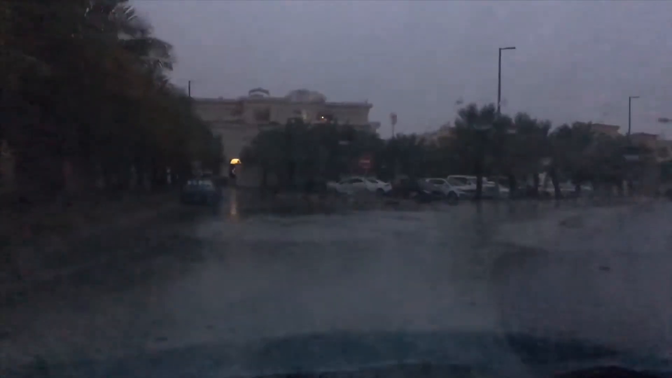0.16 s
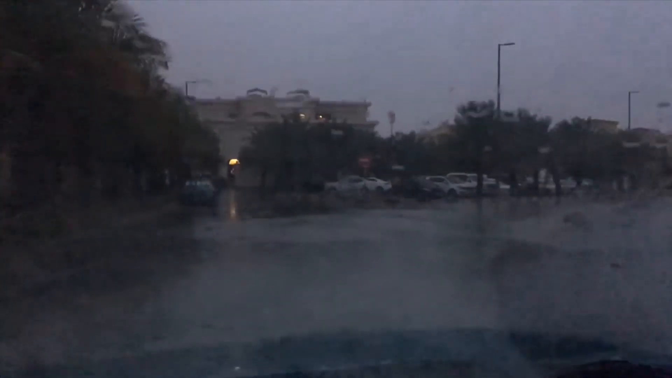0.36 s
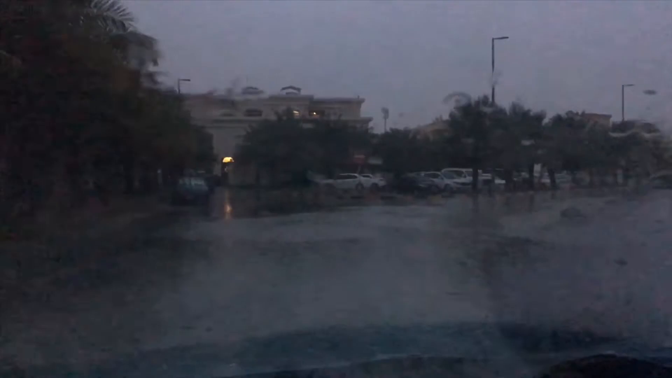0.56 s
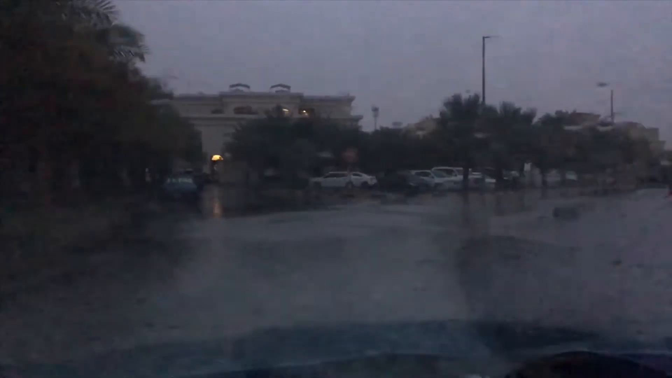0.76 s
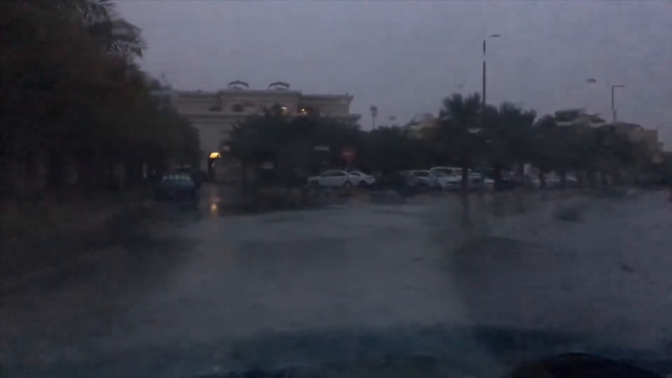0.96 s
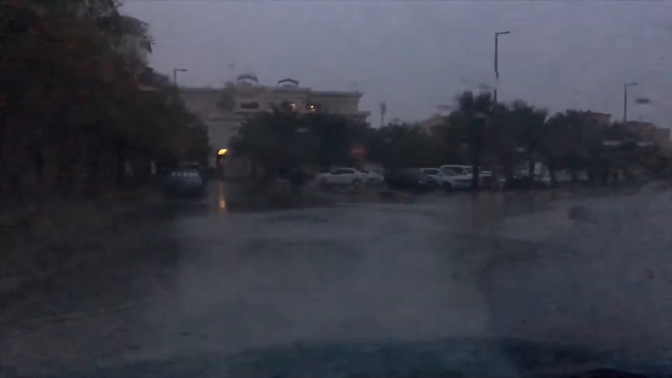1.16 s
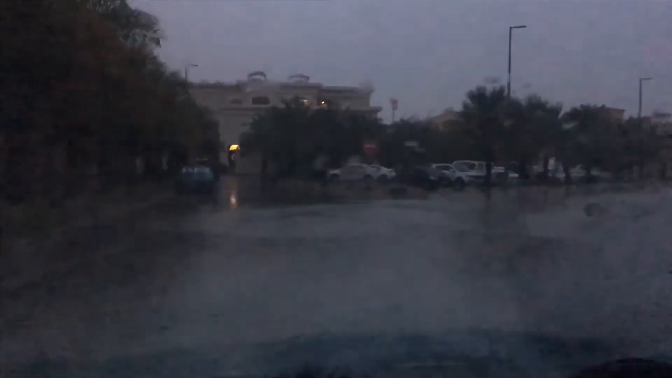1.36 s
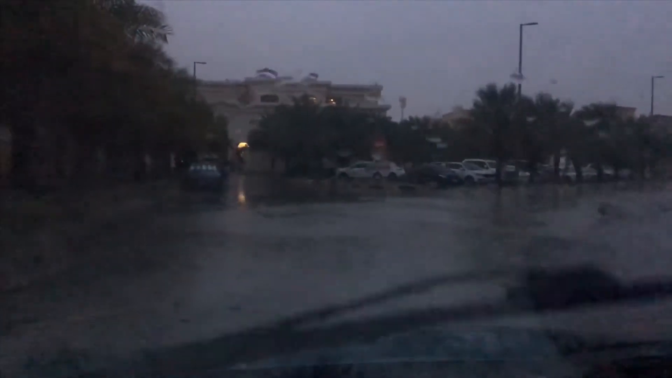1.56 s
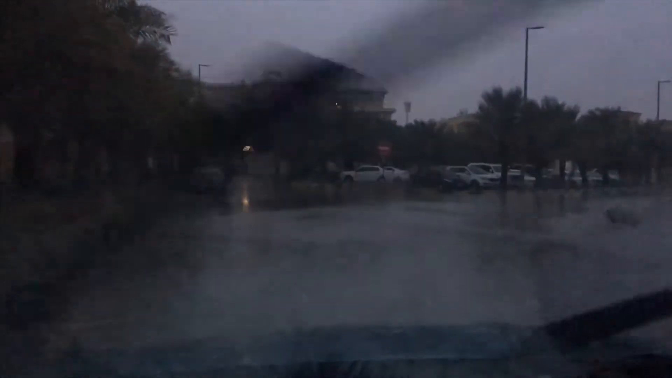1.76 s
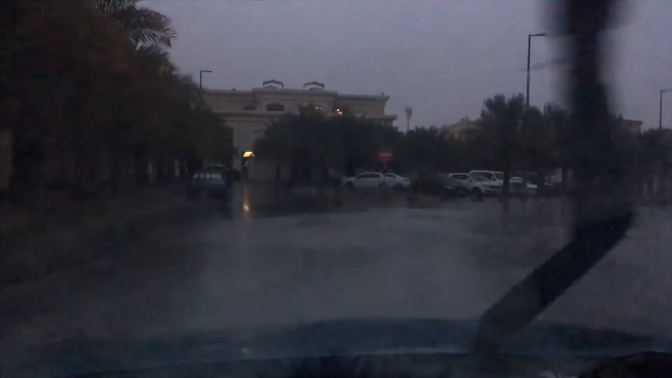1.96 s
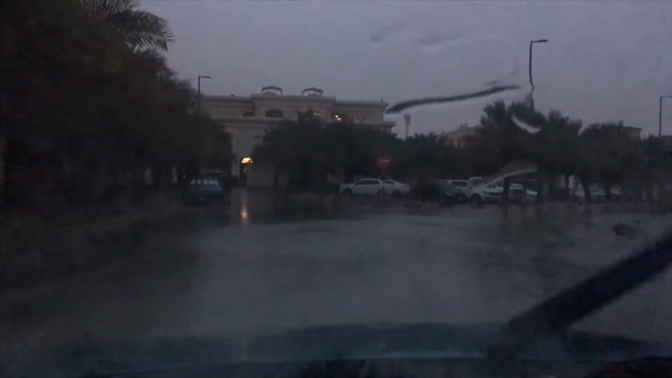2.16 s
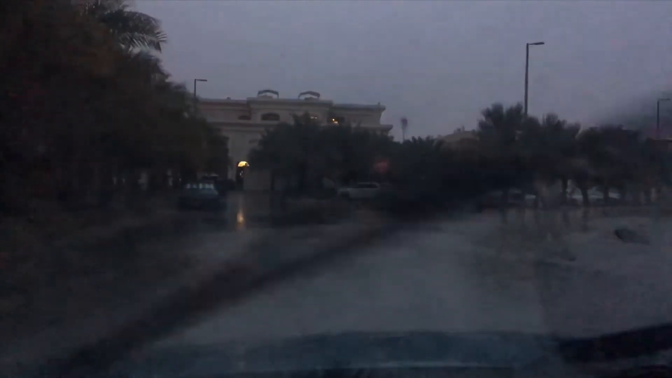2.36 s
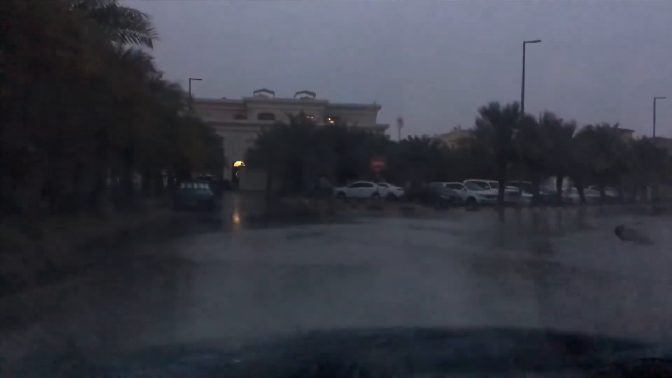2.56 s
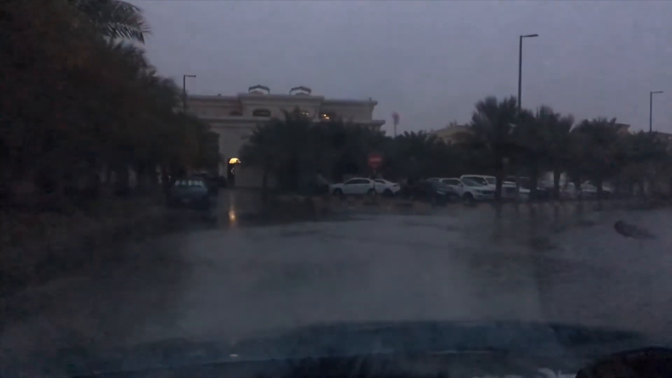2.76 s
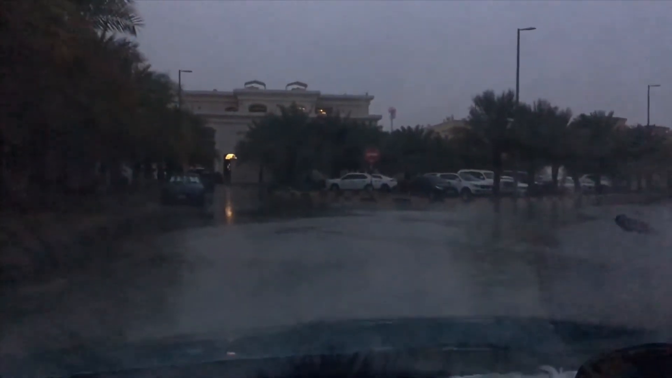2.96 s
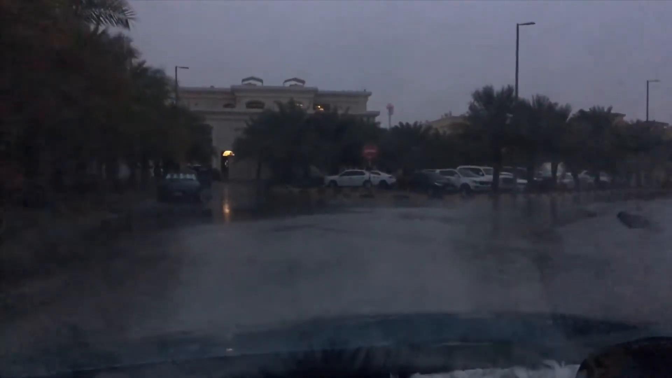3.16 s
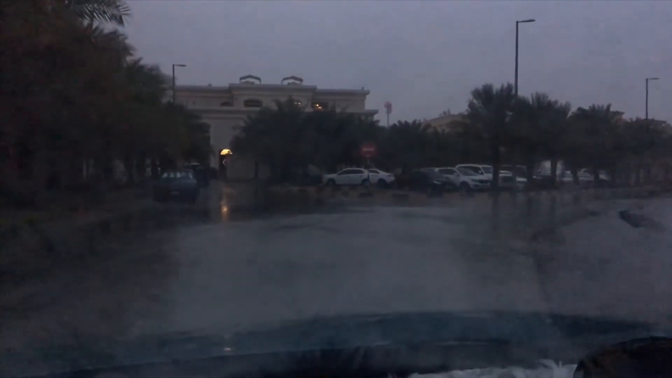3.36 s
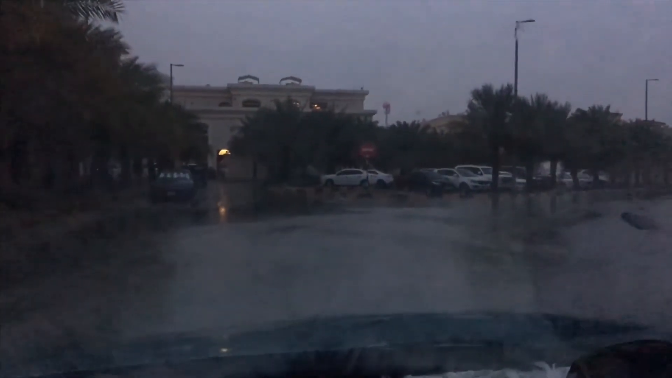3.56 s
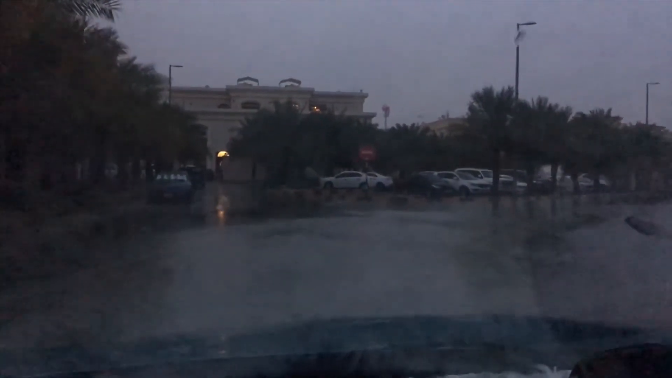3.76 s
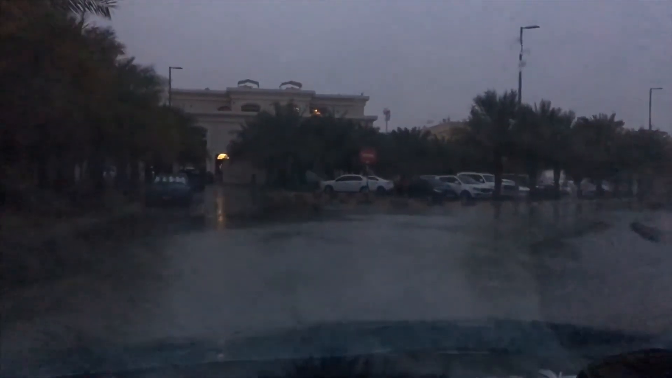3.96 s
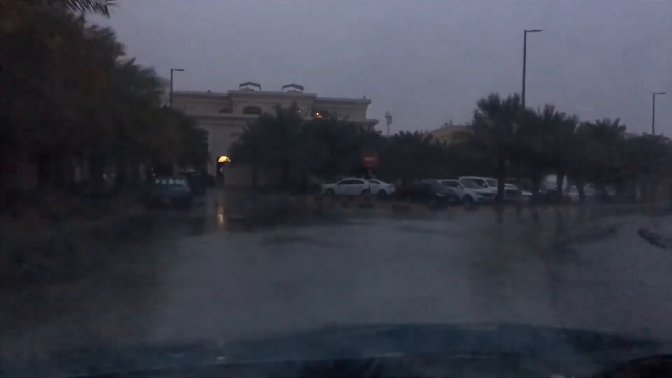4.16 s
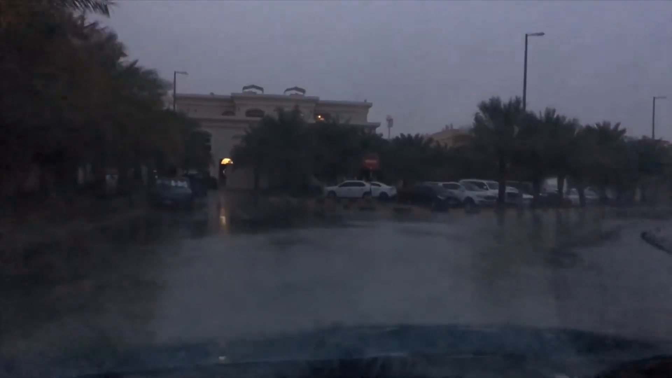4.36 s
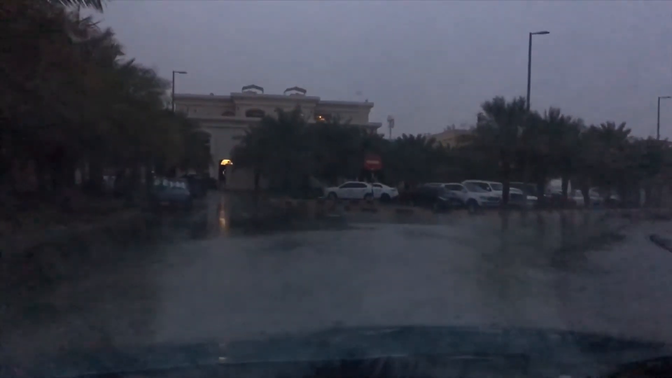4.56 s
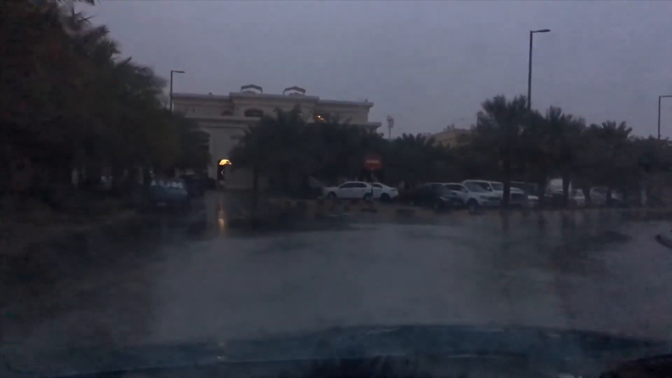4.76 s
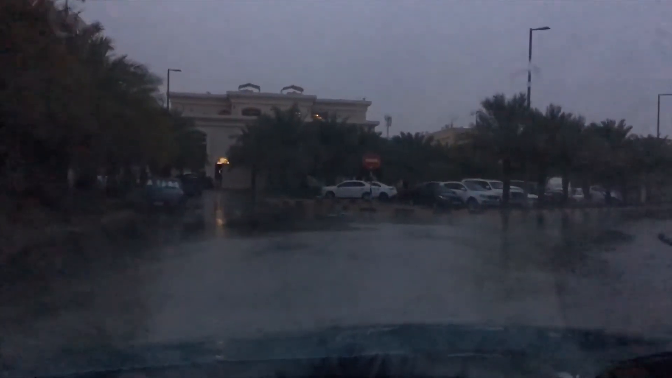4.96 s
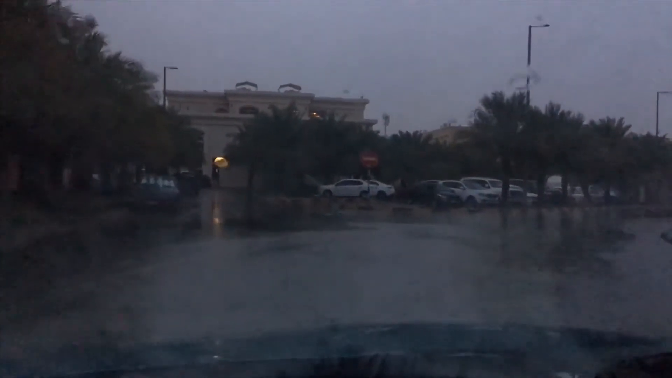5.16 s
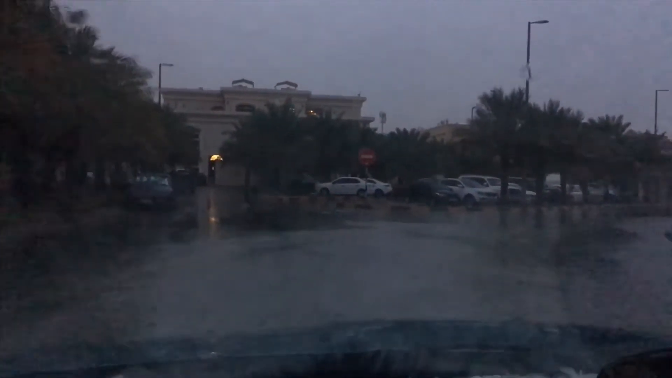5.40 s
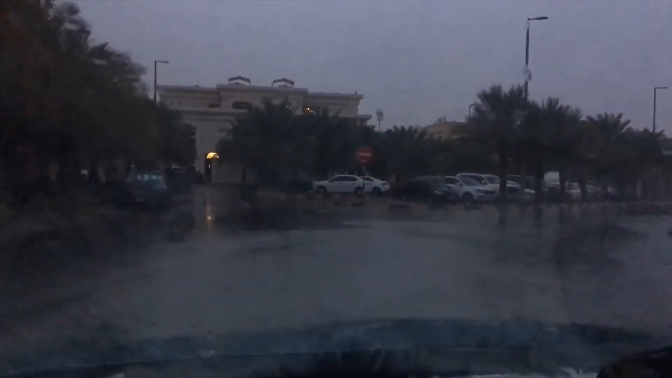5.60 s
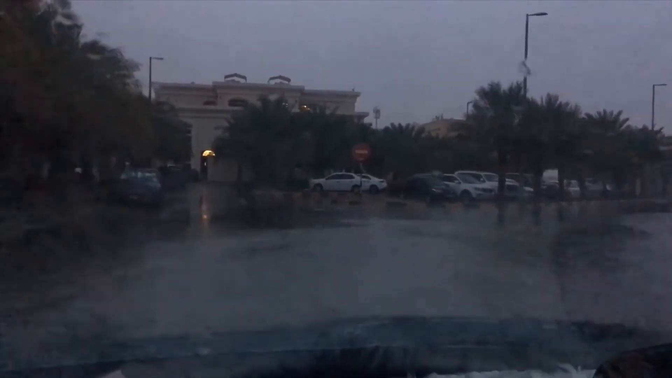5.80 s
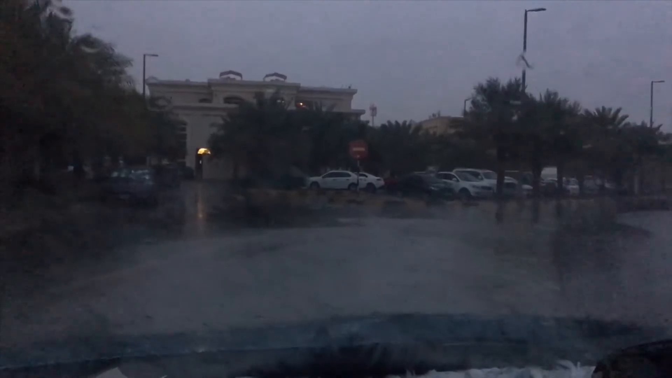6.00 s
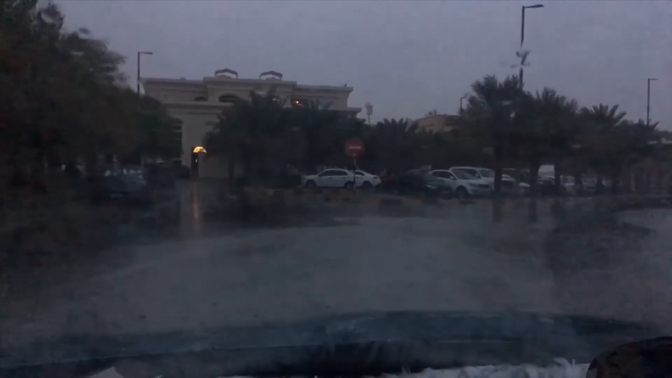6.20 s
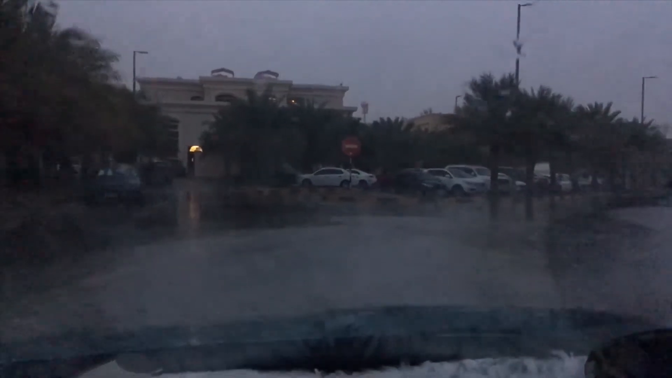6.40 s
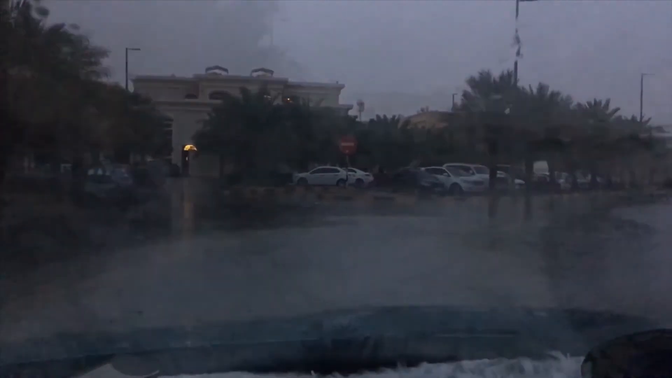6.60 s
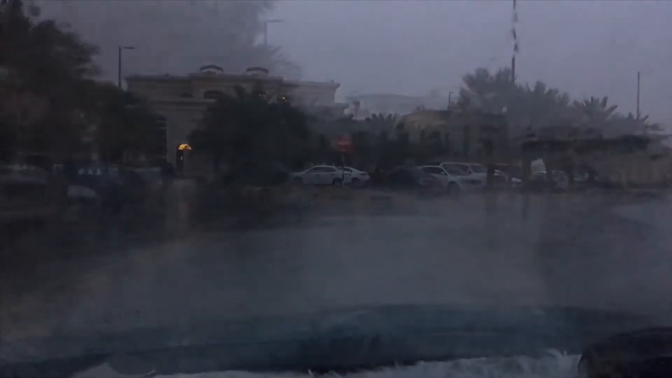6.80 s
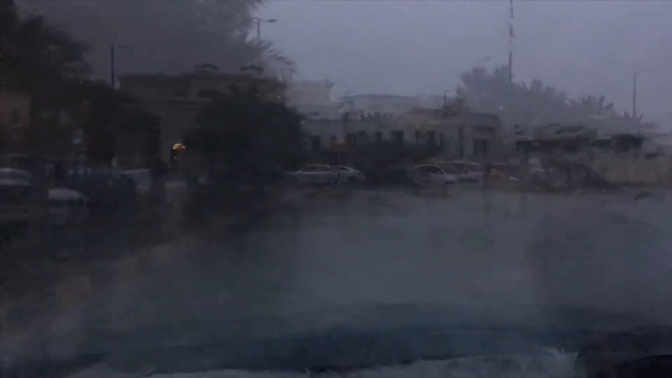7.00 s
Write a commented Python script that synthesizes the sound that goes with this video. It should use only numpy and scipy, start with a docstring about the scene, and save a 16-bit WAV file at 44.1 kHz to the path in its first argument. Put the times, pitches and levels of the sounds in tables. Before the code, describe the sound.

The sound is heard from behind the windshield of a slowly rolling car. A low tyre boom fills the cabin for all seven seconds, with a faint wash of water beneath it. Rain patters on the glass and roof, with distinct larger drops and a few sharp trim ticks in the first second. At about 1.2 seconds a switch clicks. From 1.3 to 2 seconds the wiper drags up the glass, the loudest event, its rubber thudding, juddering and giving short, low, falling groans. A sharp click marks the turn at 2 seconds. The blade slides back softly with a brief motor hum and stops with a click near 2.7 seconds. The rain then continues more lightly, with scattered taps, faint ticks and a few dull drips on the roof between 4 and 5.3 seconds. The rumble swells slightly around 4.3 and 6 seconds.

```python
"""Inside a car rolling slowly along a wet road in heavy rain.
The tyres make the cabin boom and wash through water. Drops patter on the glass and roof,
and hard bits of trim tick now and then. The wiper makes one sweep: a relay clicks, the rubber
blade sticks and slips up the glass, juddering and groaning, then slides back softly as its motor hums."""
import sys
import numpy as np
from scipy import signal
from scipy.fft import rfft, irfft
from scipy.io import wavfile
from scipy.ndimage import uniform_filter1d

SR = 44100
rng = np.random.default_rng(int(sys.argv[2]) if len(sys.argv) > 2 else 0)


def unload_audio(sound):
    """Save the sound as a 16-bit wav file, at the path given as the first command line argument."""
    columns = np.transpose(np.atleast_2d(sound))
    # keep every value between -1 and 1, then stretch to whole-number steps
    steps = np.round(np.clip(columns, -1, 1) * 32767)
    wavfile.write(sys.argv[1], SR, steps.astype(np.int16))


N = 310464
TIME = np.arange(N) / SR

# The bright tone of fine spray and tiny cracks. Each row: frequency in Hz, level in dB.
SPRAY = [(2000, -37.5), (4500, 2), (7000, 3), (9500, 2.5), (12000, 3), (15500, -4)]


def undb(db):
    """Turn decibels into a number to multiply by."""
    return 10 ** (np.asarray(db) / 20)


def curve(rows):
    """Join (seconds, value) points with straight lines."""
    return np.interp(TIME, *np.transpose(rows))


def unit(x):
    """Scale a sound to an average (rms) size of 1."""
    return x / np.sqrt(np.mean(x ** 2))


def peak(x, db):
    """Scale a sound so that its highest peak is at this level."""
    return x * undb(db) / np.max(np.abs(x))


def add(out, s, x):
    """Mix a sound in, starting at s seconds."""
    i = int(s * SR)
    out[i:i + len(x)] += x[:N - i]


def colour(x, points, tilt_db=0, size=8192):
    """Shape the tone through (Hz, dB) points, fading beyond both ends; tilt_db is added per octave."""
    hz, db = np.transpose(points)
    octave = np.log2(np.maximum(np.fft.rfftfreq(size, 1 / SR), 1))
    outside = np.abs(octave - np.clip(octave, np.log2(hz[0]), np.log2(hz[-1])))
    gain_db = np.interp(octave, np.log2(hz), db) + tilt_db * octave - 20 * outside
    # Build the filter so that it rings only after a hit, never before it.
    cepstrum = irfft(np.log(undb(gain_db)))
    cepstrum[1:size // 2] *= 2
    cepstrum[size // 2 + 1:] = 0
    response = irfft(np.exp(rfft(cepstrum)))
    return signal.oaconvolve(x, response)[:len(x)]


def uneven(points, scatter_db):
    """Nudge a tone's levels at random, since every spot sounds a little different when hit."""
    hz, db = np.transpose(points)
    return np.column_stack([hz, db + scatter_db * rng.standard_normal(len(db))])


def walk(rate):
    """A smooth random wobble that heads for a new value `rate` times a second."""
    hold = max(int(SR / rate), 1)
    steps = np.repeat(rng.standard_normal(N // hold + 1), hold)
    return unit(uniform_filter1d(uniform_filter1d(steps, hold), hold)[:N])


def fade(t60, size=6000):
    """Die away by 60 dB every t60 seconds."""
    return np.exp(-np.log(1000) * TIME[:size] / t60)


def swell(start, end, attack_s, release_s):
    """A loudness shape: rise in a straight line, hold until the end, then die away."""
    rise = np.clip((TIME - start) / attack_s, 0, 1)
    return rise * np.exp(-np.maximum(TIME - end, 0) / release_s)


def sagging(hz, start, octaves_per_s):
    """The phase of a tone whose pitch sinks steadily from the start time on."""
    pitch = hz * 2 ** (-octaves_per_s * np.maximum(TIME - start, 0))
    return 2 * np.pi * np.cumsum(pitch) / SR


def burst(crack_t60, tail_db, tail_t60, size=6000):
    """A short crack of noise followed by a fainter, longer tail."""
    return rng.standard_normal(size) * (fade(crack_t60) + undb(tail_db) * fade(tail_t60))


def ring(modes, scatter_db, detune, size=6000):
    """A struck part rings at its own notes (modes), which vary with where the blow lands."""
    out = np.zeros(size)
    for hz, db, t60 in modes:
        louder, higher, side = rng.standard_normal(3)
        tone = np.sin(2 * np.pi * hz * (1 + detune * higher) * TIME[:size])
        out += np.sign(side) * undb(db + scatter_db * louder) * fade(t60, size) * tone
    return out


def favour(modes, centre_hz, db_per_octave):
    """A blow brings out the notes nearest to its own pitch."""
    return [(hz, db - db_per_octave * abs(np.log2(hz / centre_hz)), t60) for hz, db, t60 in modes]


def impacts(rate, spread_db, cap_db):
    """Random hits, about `rate` a second, many small and few large."""
    size_db = np.minimum(spread_db * rng.exponential(size=N), cap_db)
    return (rng.random(N) < rate / SR) * undb(size_db) * rng.choice([-1, 1], N)


def shower(rate, spread_db, cap_db, crack_t60, tail_db, tail_t60):
    """Random hits, each a short crack of noise with a faint tail."""
    shape = fade(crack_t60) + undb(tail_db) * fade(tail_t60)
    energy = signal.oaconvolve(impacts(rate, spread_db, cap_db) ** 2, shape ** 2)[:N]
    return rng.standard_normal(N) * np.sqrt(np.abs(energy))


def road():
    """The tyres shake the cabin's air and push through standing water."""
    # The tone of the cabin's boom and of the water. Each row: frequency in Hz, level in dB.
    boom_tone = [(15, -13.5), (24, -6), (33, -5.5), (44, -4.5), (54, 3), (72, -8.5), (105, -14.5),
                 (145, -13.5), (185, -23.5), (240, -40.5), (400, -52)]
    wash_tone = [(100, -5), (180, 0), (270, -1.5), (370, -3), (500, -11.5), (700, -17.5), (1200, -21),
                 (3000, -33), (8000, -49.5)]
    # How loud each is as the car rolls on. Each row: time in seconds, level in dB.
    boom_levels = [(0, -29), (.8, -28), (1.2, -32.5), (3.6, -29.5), (4.3, -26), (4.8, -28.5), (6.1, -24.5),
                   (7.04, -28)]
    wash_levels = [(0, -50), (1, -50), (2.3, -50), (3.5, -50), (4.3, -49.5), (5.4, -48), (6.2, -49),
                   (7.04, -52)]
    boom = colour(rng.standard_normal(N), boom_tone)
    boom /= np.sqrt(uniform_filter1d(boom ** 2, size=9000))  # even rolling keeps the boom steady
    wash = unit(colour(rng.standard_normal(N), wash_tone))
    puddles_db = walk(14)
    return boom * undb(curve(boom_levels)) + wash * undb(curve(wash_levels) + puddles_db)


def rain():
    """Small drops patter on glass and roof; their spray follows the rain and also comes in flurries."""
    # The patter on the car. Each row: time in seconds, level in dB.
    rain_levels = [(0, -53), (.8, -58.5), (1.5, -55.5), (2.9, -60.5), (6.2, -61.5), (7.04, -62)]
    # The tone of drops heard through glass. Each row: frequency in Hz, level in dB.
    glass_tone = [(200, 2.5), (600, 8.5), (1200, -2), (1900, 0.5), (2500, -3.5), (3300, 1), (4300, -4),
                  (5000, -11), (6400, -10.5), (8000, -18), (9500, -18.5), (12000, -42), (16000, -32)]
    # Flurries of fine spray. Each row: start and end in seconds, level in dB.
    flurries = [(0.493, 0.54, -53), (.56, .79, -67), (1.93, 2.456, -69.5), (2.55, 2.767, -66),
                (3.007, 3.293, -70)]
    rain_db = curve(rain_levels)
    taps = shower(rate=480, spread_db=6, cap_db=18, crack_t60=.0028, tail_db=-15, tail_t60=.05)
    specks = shower(rate=200, spread_db=5.5, cap_db=17, crack_t60=.003, tail_db=-15, tail_t60=.06)
    gusts_db = .6 * walk(7.4)
    patter = unit(colour(taps, glass_tone)) * undb(rain_db + gusts_db)
    fizz_gain = undb(-79 + rain_db - rain_db.mean())
    flurry_gain = sum(undb(db) * swell(start, end, attack_s=.012, release_s=.029)
                      for start, end, db in flurries)
    spray = unit(colour(specks, SPRAY)) * np.hypot(fizz_gain, flurry_gain)
    distant_sizzle = unit(colour(rng.standard_normal(N), SPRAY)) * undb(-82)
    return patter + spray + distant_sizzle


def drop(db, splash_db):
    """One drop taps the windshield and splashes; small ones just tick, large ones splatter on."""
    # The tone of the tap. Each row: frequency in Hz, level in dB.
    tap_tone = [(600, -0.5), (1500, -7.5), (2500, -3), (3400, -1.5), (4300, -4), (5100, -11.5), (6500, -14),
                (8500, -26.5)]
    full_splatter_db = -37  # drops at least this loud get the strongest tail
    tail_db = min(db - full_splatter_db, 0) - 11.5
    contact = burst(crack_t60=.002, tail_db=tail_db, tail_t60=.045)
    spatter = burst(crack_t60=.002, tail_db=tail_db - 4, tail_t60=.04)
    tap = colour(contact, uneven(tap_tone, scatter_db=1.5))
    splash = colour(spatter, uneven(SPRAY, scatter_db=6.5))
    return peak(tap, db) + peak(splash, splash_db)


def stray_drops():
    """Middle-sized drops stand out of the patter at random moments."""
    out = np.zeros(N)
    drops_per_s, scatter_db = 9, 1.8
    for s in rng.uniform(0, N / SR, int(drops_per_s * N / SR)):
        tap_db, splash_db = rng.normal([-46.5, -57], scatter_db)
        add(out, s, drop(tap_db, splash_db))
    return out


def heavy_drops():
    """Large drops hit the windshield; fat drips knock dully on the lined roof."""
    # Drops on the windshield. Each row: time in seconds, peak of the tap and of the splash in dB.
    drops = [(0.0817, -42, -37), (0.214, -36, -39), (0.2594, -40, -54), (0.4015, -31, -48),
             (0.414, -34, -39), (0.4576, -36.5, -35.5), (0.5186, -38.5, -36), (0.681, -33, -43),
             (1.068, -36.5, -72), (1.1588, -38, -43), (2.0907, -40.5, -41), (2.1472, -36, -40),
             (2.3635, -34.5, -54), (2.6803, -39, -40.5), (2.944, -38, -55), (3.0972, -33, -46),
             (3.2095, -35.5, -40.5), (3.312, -36, -55), (3.98, -42, -43), (4.0403, -40.5, -49),
             (4.113, -42, -46), (4.533, -45, -46), (5.095, -37.5, -52), (5.1693, -39, -54),
             (5.485, -40.5, -45.5), (5.5872, -37.5, -53), (5.888, -42, -48.5), (5.931, -37, -60),
             (6.044, -40, -60), (6.201, -40, -49), (6.364, -42.5, -56)]
    # Drips on the roof. Each row: time in seconds, peak in dB.
    drips = [(4.05, -36), (4.812, -43), (5.295, -44)]
    # The roof's dull tone. Each row: frequency in Hz, level in dB.
    roof_tone = [(450, -7), (950, 5), (1700, -11), (4000, -14)]
    out = np.zeros(N)
    for s, db, splash_db in drops:
        add(out, s, drop(db, splash_db))
    for s, db in drips:
        knock = burst(crack_t60=.02, tail_db=-7, tail_t60=.08)
        add(out, s, peak(colour(knock, roof_tone), db))
    return out


def trim_ticks():
    """Small hard parts tick and ring briefly, each at its own pitch, brighter for a harder contact."""
    # The ticks. Each row: time in seconds, peak in dB, treble tilt in dB per octave, pitch in Hz.
    ticks = [(0.187, -23, 4, 11300), (0.2809, -35, 7, 11400), (0.3847, -39.5, -1, 15000),
             (0.5075, -32.5, 0, 5000), (0.525, -36, -4, 11500), (0.696, -19.5, 5.5, 8950),
             (0.742, -41.5, -3, 9000), (1.9405, -39, -5, 8050), (1.9637, -33.5, 6, 12000),
             (1.986, -48, 3, 9200), (2.245, -34.5, -2, 7150), (2.3093, -42, -1, 7900),
             (3.565, -54.5, -2, 11300), (3.8571, -47, 6, 10900), (4.9257, -44.5, 5, 10900),
             (5.278, -48, 1, 13800)]
    # The notes of the trim. Each row: pitch in Hz, level in dB, fade time in seconds.
    trim_modes = [(1810, -6, 0.06), (4330, -6, 0.032), (7850, -9, 0.035), (8950, -2, 0.029),
                  (9230, -6, 0.04), (10420, -10, 0.035), (10900, -9, 0.035), (11450, -6, 0.039),
                  (12550, -13, .03), (13850, -3, 0.02), (15450, -11, .025)]
    out = np.zeros(N)
    for s, db, tilt_db, ring_hz in ticks:
        contact = burst(crack_t60=.003, tail_db=-12, tail_t60=.055)
        crack = colour(contact, uneven(SPRAY, scatter_db=9), tilt_db)
        ping = ring(favour(trim_modes, ring_hz, db_per_octave=7.5), scatter_db=5, detune=.011)
        tick = peak(ping, 0) + peak(crack, 0)  # equal parts
        add(out, s, peak(tick, db))
    return out


def motor():
    """The wiper motor's wavering hum swells, sinks a little and fades on the way back."""
    start, end, hum_hz = 2.02, 2.21, 123.3
    speed = 1 + .05 * walk(40)
    hum = unit(np.sin(sagging(hum_hz * speed, start, octaves_per_s=.13)))
    level_db = -34 + 3 * walk(30)
    return hum * undb(level_db) * swell(start, end, attack_s=.2, release_s=.4)


def relay():
    """The wiper's electric switch clicks at the start, turn and end of the sweep; its case rings."""
    # The clicks. Each row: time in seconds, peak in dB, treble tilt in dB per octave,
    # ring in dB compared with the click.
    clicks = [(1.223, -23.5, 5, -14), (1.257, -29.5, -0.5, -13), (2.012, -18.5, 0, -12),
              (2.738, -28, -5.5, -3)]
    # The tone of the case. Each row: frequency in Hz, level in dB.
    case_tone = [(500, -63), (1100, -15.5), (1400, -0.5), (1900, 1), (2400, -7), (3200, -1), (4200, -11),
                 (5900, -6), (7800, -18), (9500, -14), (12300, -24), (15500, -26)]
    # The notes of the case. Each row: pitch in Hz, level in dB, fade time in seconds.
    case_modes = [(1767, -10.5, 0.079), (1810, -6, 0.058), (1965, -8.5, 0.098)]
    out = np.zeros(N)
    for s, db, tilt_db, ring_db in clicks:
        for delay_s, bounce_db in ((0, 0), (.01, -8.5)):  # the contact hits, then bounces once
            snap = burst(crack_t60=.012, tail_db=-9, tail_t60=.06)
            click = colour(snap, uneven(case_tone, scatter_db=4), tilt_db)
            add(out, s + delay_s, peak(click, db + bounce_db))
        add(out, s, peak(ring(case_modes, scatter_db=6, detune=.0032), db + ring_db))
    return out


def blade_drag():
    """Countless tiny slips of the blade rumble through the glass; fewer, harder ones chatter as grit."""
    # The wiper's strokes, up and back. Each row: start and end in seconds, level in dB.
    strokes = [(1.3, 1.98, -34), (2.003, 2.655, -47.5)]
    # Where the rubber grips harder. Each row: start and end in seconds, rumble and grit in dB.
    rubs = [(1.311, 1.364, -26, -39.5), (1.373, 1.475, -27.5, -45.5), (1.484, 1.542, -27.5, -44),
            (1.605, 1.65, -25, -56), (1.682, 1.701, -26, -52), (1.847, 1.913, -32.5, -38.5),
            (1.89, 1.946, -26, -46.5), (2.357, 2.422, -36, -56.5), (2.599, 2.646, -39.5, -56)]
    # The tone of the rumble and of the grit. Each row: frequency in Hz, level in dB.
    rumble_tone = [(50, -17.5), (110, -1), (170, 4.5), (215, 1), (300, -3), (400, -7), (560, -21),
                   (750, -36), (1500, -50)]
    grit_tone = [(300, -18), (560, 6.5), (850, 3), (1300, -6.5), (1900, -12.5), (2600, -16), (4000, -30.5),
                 (6000, -34), (14000, -46.5)]
    attack_s, release_s = .015, .029
    rumble_gain = sum(undb(db) * swell(start, end, attack_s, release_s) for start, end, db in strokes)
    grit_gain = rumble_gain * undb(-39)
    for start, end, rumble_db, grit_db in rubs:
        grip = swell(start, end, attack_s, release_s)
        rumble_gain = np.hypot(rumble_gain, grip * undb(rumble_db))
        grit_gain = np.hypot(grit_gain, grip * undb(grit_db))
    slips = impacts(rate=1500, spread_db=1.5, cap_db=13)
    chatter = shower(rate=330, spread_db=2, cap_db=6, crack_t60=.005, tail_db=-15, tail_t60=.03)
    return unit(colour(slips, rumble_tone)) * rumble_gain + unit(colour(chatter, grit_tone)) * grit_gain


def blade_groan():
    """Where the rubber slips regularly it sings a low, sinking note, sometimes hoarse, sometimes clean."""
    # The groans. Each row: start and end in seconds, pitch in Hz, level in dB,
    # fall in octaves per second, roughness from 0 to 1.
    groans = [(1.375, 1.437, 329.8, -24.5, 0.77, 0.53), (1.512, 1.56, 313.4, -26, 1.9, .7),
              (1.527, 1.59, 176, -24.5, 4.8, .6), (1.746, 1.757, 358, -23, 2.7, 0.54),
              (1.808, 1.837, 412, -32, 1.8, 0.4), (1.835, 1.869, 325, -16.5, 3.17, 0.08),
              (1.875, 1.892, 298, -21.5, 2.8, 0.6)]
    out = np.zeros(N)
    wobble, flutter_db = .041 * walk(150), 2 * walk(120)
    for start, end, hz, db, fall, rough in groans:
        phase = sagging(hz * (1 + rough * wobble), start, fall)
        note = np.sin(phase) + undb(-22) * np.sin(2 * phase) + undb(-34) * np.sin(3 * phase)
        gain = np.sqrt(2) * undb(db + rough * flutter_db)
        out += note * gain * swell(start, end, attack_s=.016, release_s=.016)
    return out


def slip(db, slap_db, blade_hz):
    """The rubber lets go, slaps the glass and rings the windshield's notes nearest to its own pitch."""
    # The notes of the windshield. Each row: pitch in Hz, level in dB, fade time in seconds.
    glass_modes = [(112.6, 5, 0.14), (171.6, -2, 0.14), (247, 1.5, 0.025), (298.3, 5, 0.053),
                   (433, -6, 0.045), (529.4, -10.5, 0.092), (863, -13.5, 0.016)]
    # The tone of the slap. Each row: frequency in Hz, level in dB.
    slap_tone = [(400, -1.5), (900, 9.5), (1700, 2), (2600, -5), (4200, -10.5), (6500, -20), (15000, -37.5)]
    push_s = .0015  # soft rubber takes this long to push the glass
    push = 1 - np.exp(-(TIME[:6000] / push_s) ** 2)
    thud = push * ring(favour(glass_modes, blade_hz, db_per_octave=10), scatter_db=1.5, detune=.032)
    slap = colour(burst(crack_t60=.0045, tail_db=-9.5, tail_t60=.081), slap_tone)
    return peak(thud, db) + peak(slap, db + slap_db)


def blade_slips():
    """The blade sticks and lets go, in single catches and in quick juddering runs at one spot."""
    # Single catches. Each row: time in seconds, thud peak in dB, slap in dB compared with the thud,
    # blade pitch in Hz.
    catches = [(1.322, -12, -25, 440), (1.343, -11, -16.5, 330), (1.365, -17.5, -17, 240),
               (1.418, -15, -48, 260), (1.449, -13, -19.5, 480), (1.467, -18, -25, 260),
               (1.495, -17, -14.5, 110), (1.514, -14.5, -15, 312), (1.530, -9, -27, 166),
               (1.542, -14.5, -19, 318), (1.562, -17.5, -16, 163), (1.593, -22, -16, 297),
               (1.875, -25.5, -12, 330), (1.907, -15.5, -25, 540)]
    # Runs of judder. Each row: start and end in seconds, slips a second, then thud, slap, pitch as above.
    judders = [(1.606, 1.66, 119, -17, -13.5, 295), (1.691, 1.704, 115, -18, -12, 290),
               (1.923, 1.962, 98.9, -17, -33, 176)]
    out = np.zeros(N)
    for s, db, slap_db, blade_hz in catches:
        add(out, s, slip(db, slap_db, blade_hz))
    for start, end, rate, db, slap_db, blade_hz in judders:
        one_slip = slip(db, slap_db, blade_hz)
        for s in np.arange(start, end, 1 / rate):
            jitter_s, jitter_db = rng.normal(0, [.00042, 2])
            add(out, s + jitter_s, one_slip * undb(jitter_db))
    return out


def scene():
    """Everything as heard from behind the windshield, in one channel."""
    wiper = relay() + blade_slips() + blade_groan() + blade_drag() + motor()
    return (road() + rain() + heavy_drops() + trim_ticks() + wiper + stray_drops())[None]


def record(dry):
    """Cut away the very highest treble."""
    top_hz = 16000
    return signal.sosfilt(signal.ellip(8, .2, 70, top_hz, fs=SR, output="sos"), dry)


dry = scene()
out = record(dry)
unload_audio(out)
```